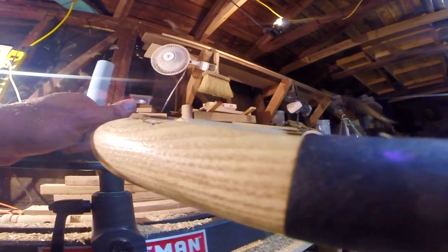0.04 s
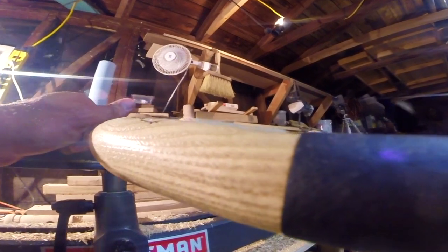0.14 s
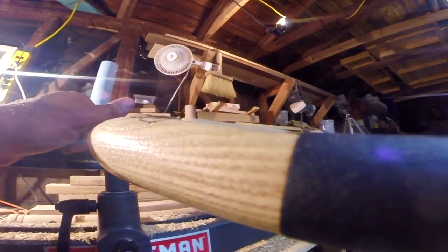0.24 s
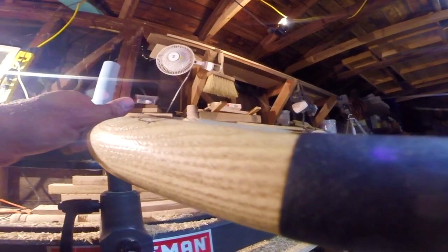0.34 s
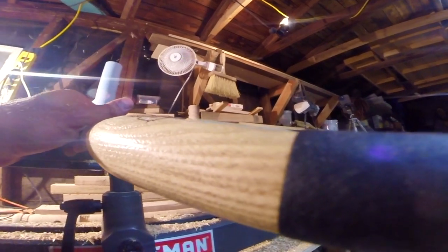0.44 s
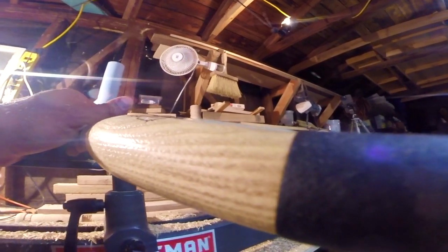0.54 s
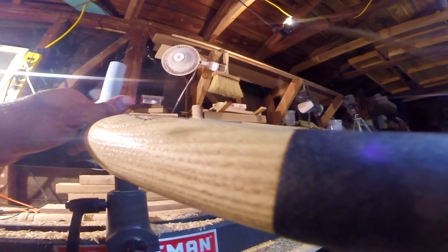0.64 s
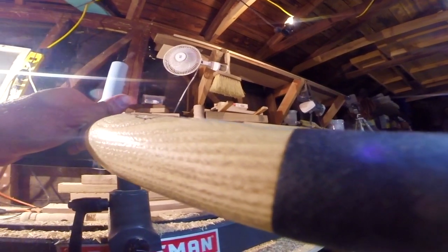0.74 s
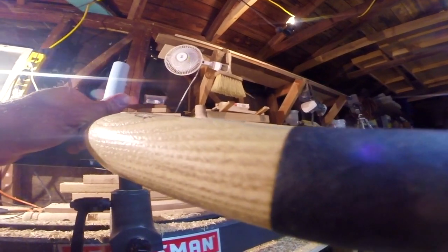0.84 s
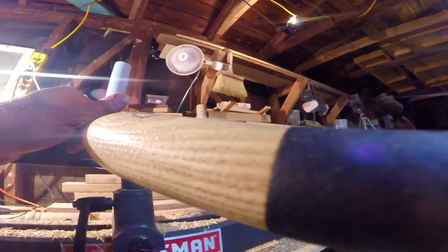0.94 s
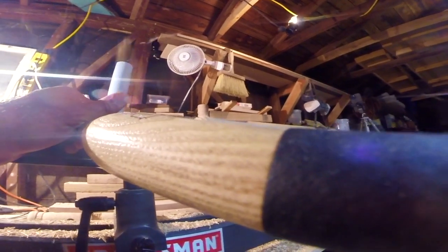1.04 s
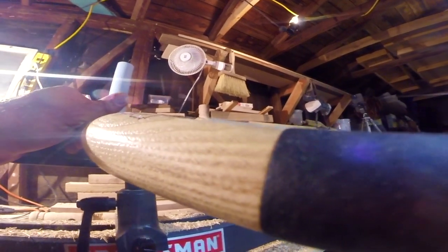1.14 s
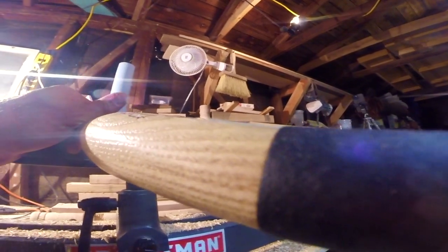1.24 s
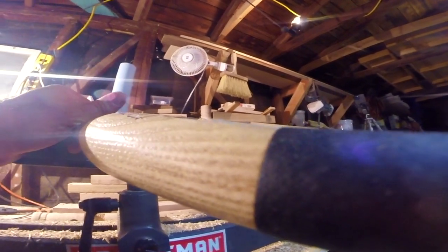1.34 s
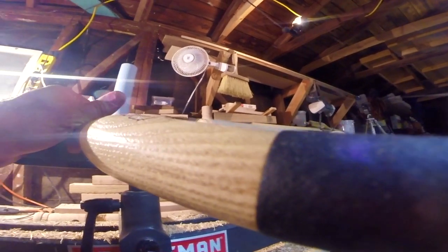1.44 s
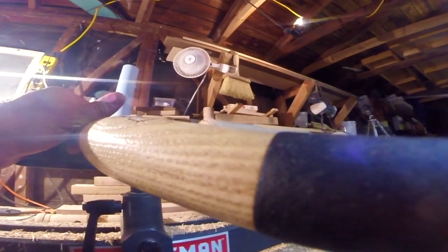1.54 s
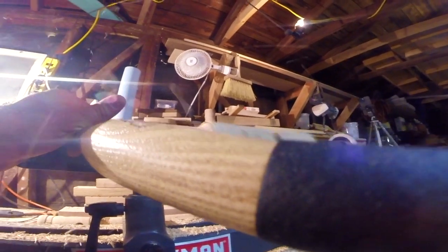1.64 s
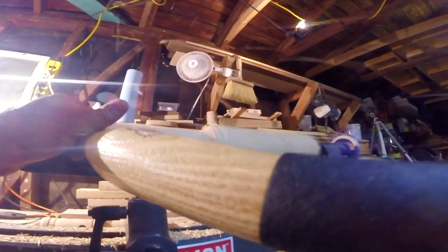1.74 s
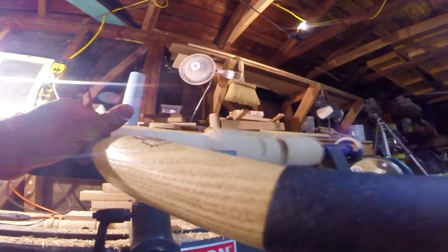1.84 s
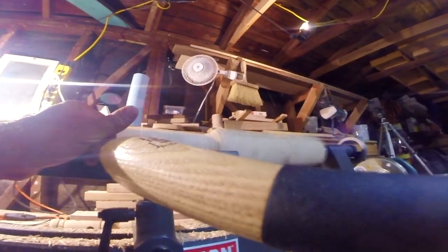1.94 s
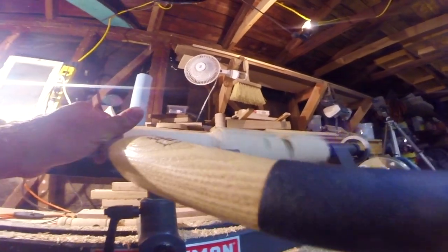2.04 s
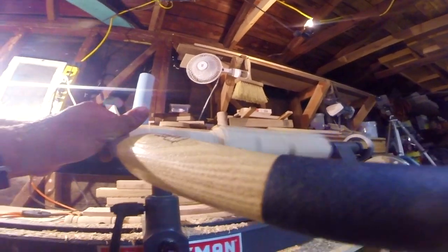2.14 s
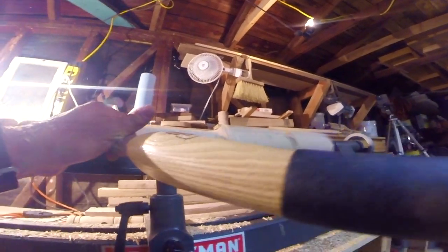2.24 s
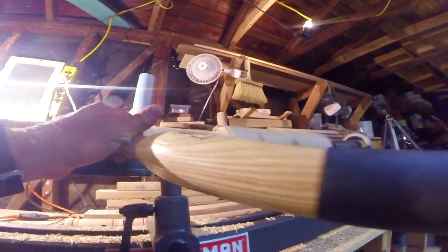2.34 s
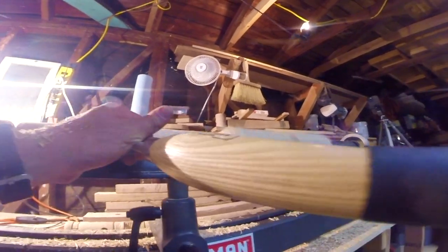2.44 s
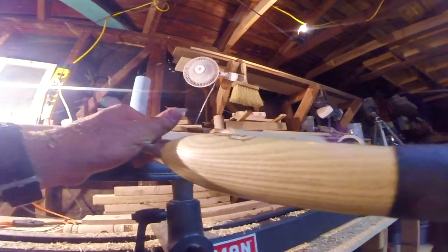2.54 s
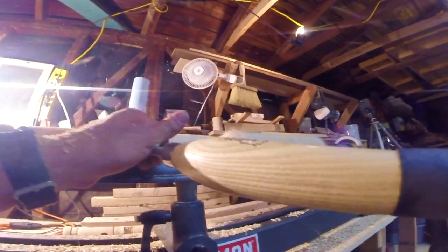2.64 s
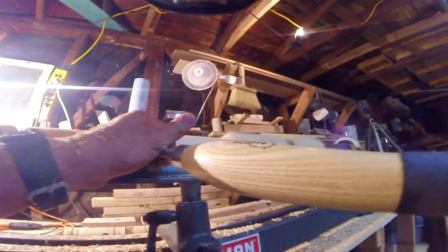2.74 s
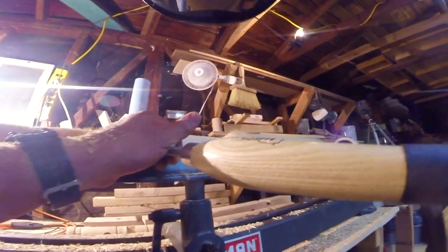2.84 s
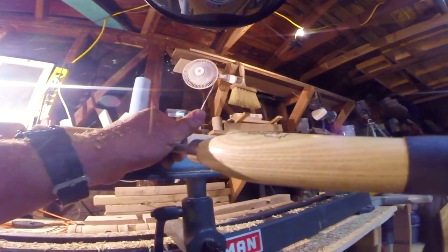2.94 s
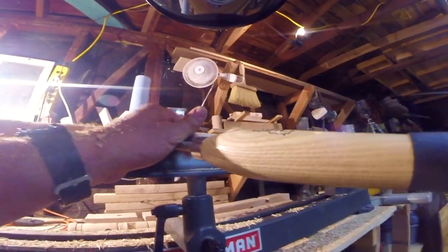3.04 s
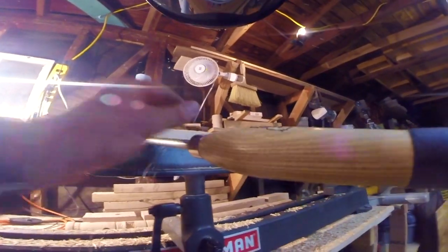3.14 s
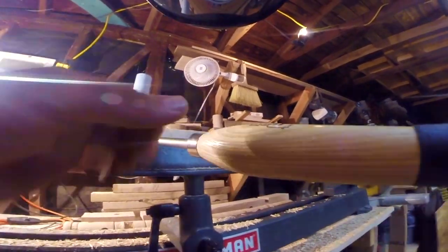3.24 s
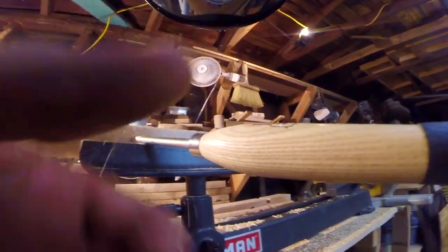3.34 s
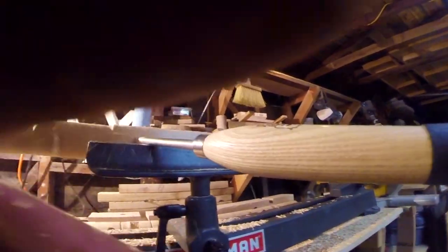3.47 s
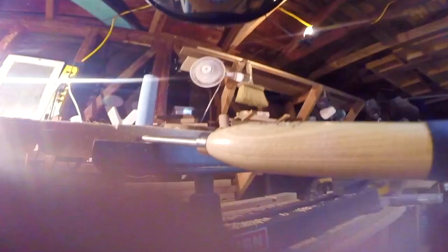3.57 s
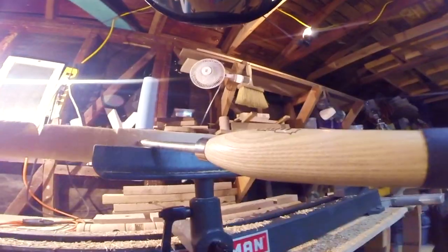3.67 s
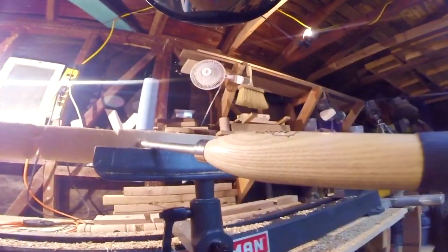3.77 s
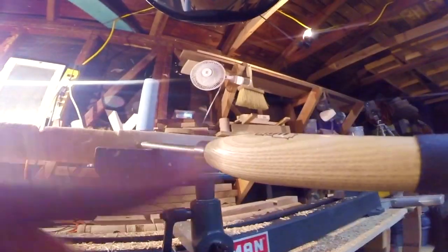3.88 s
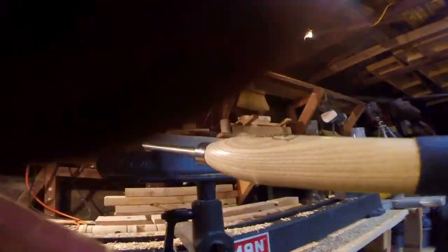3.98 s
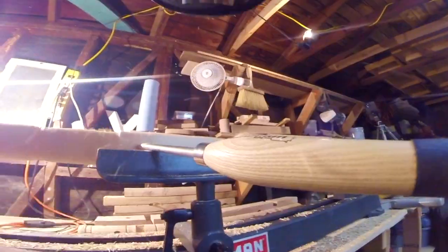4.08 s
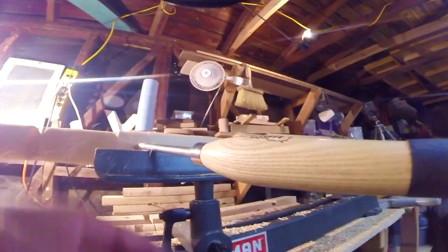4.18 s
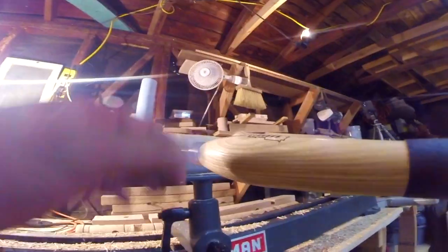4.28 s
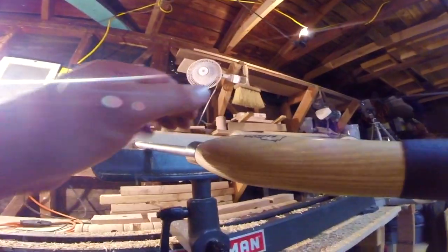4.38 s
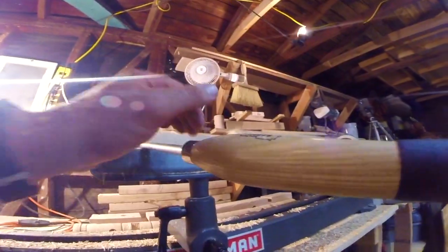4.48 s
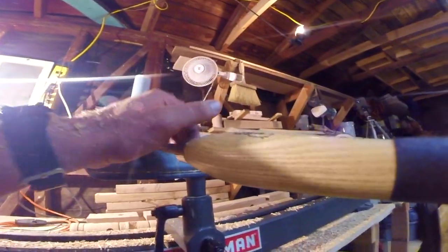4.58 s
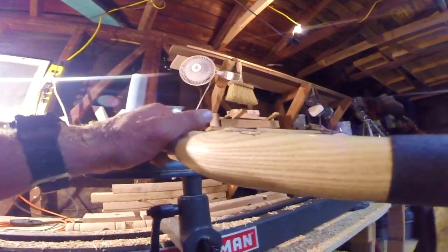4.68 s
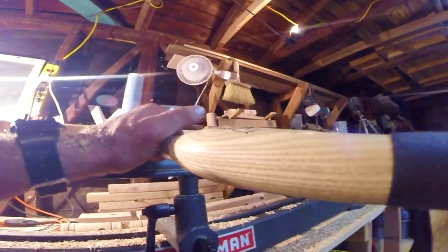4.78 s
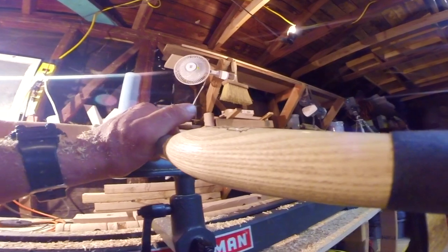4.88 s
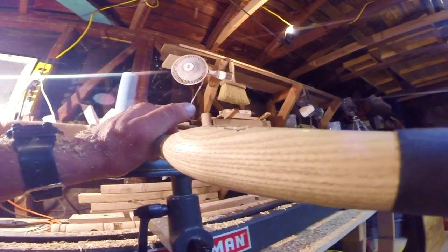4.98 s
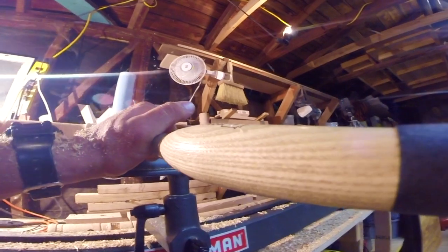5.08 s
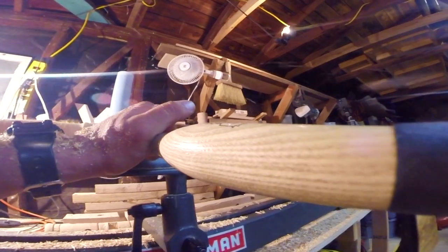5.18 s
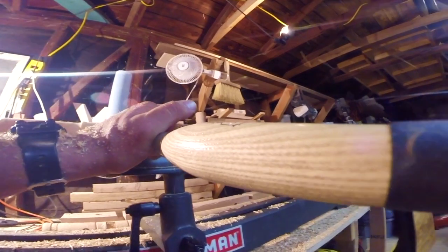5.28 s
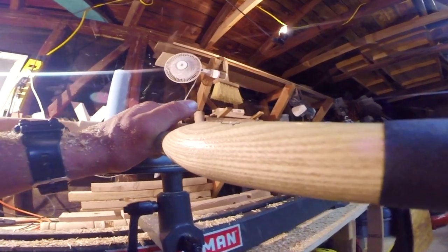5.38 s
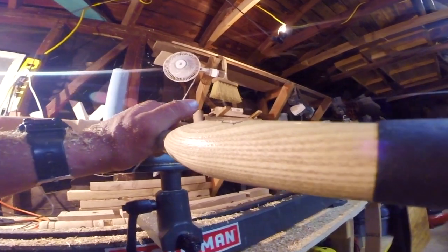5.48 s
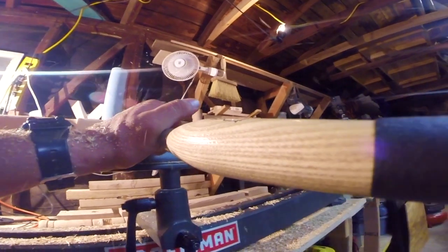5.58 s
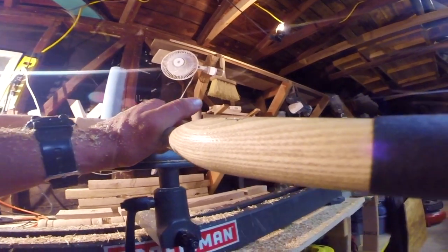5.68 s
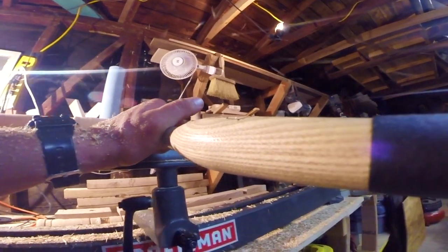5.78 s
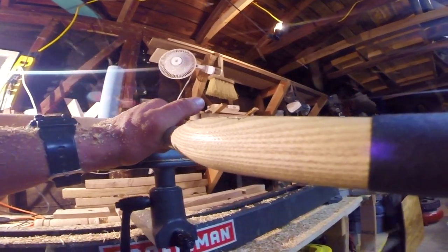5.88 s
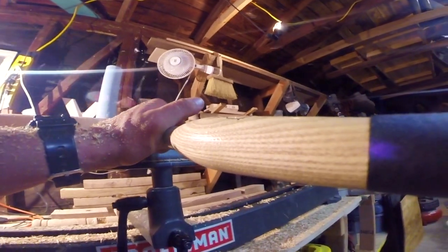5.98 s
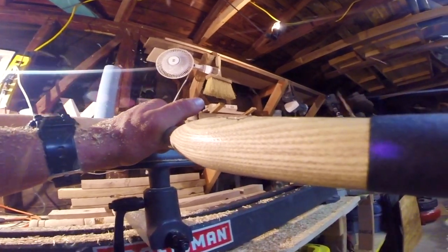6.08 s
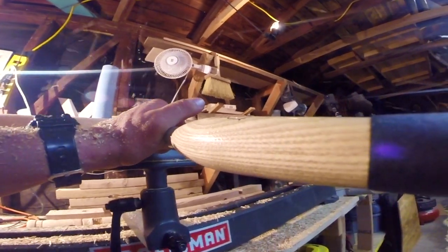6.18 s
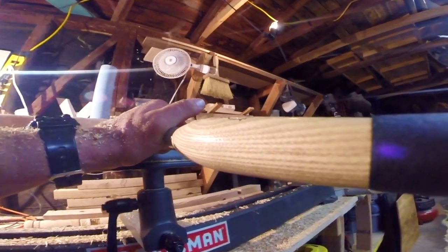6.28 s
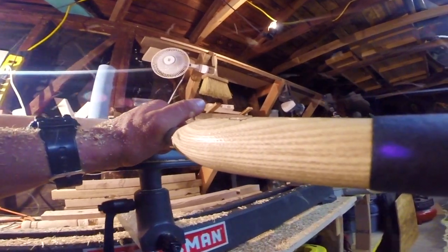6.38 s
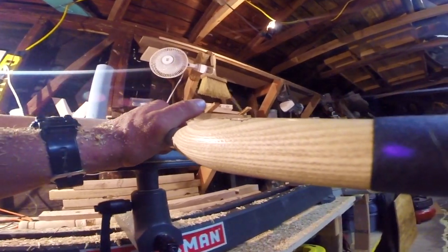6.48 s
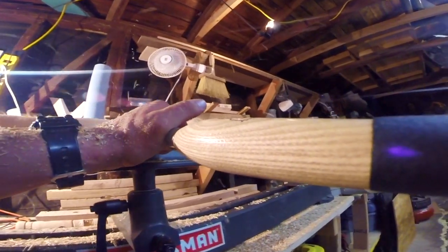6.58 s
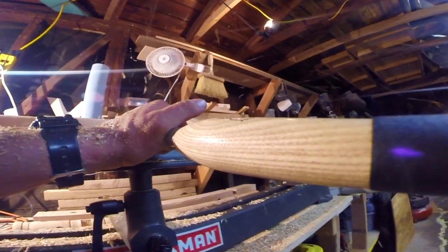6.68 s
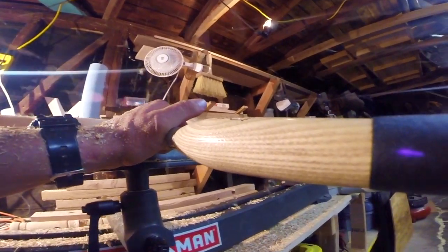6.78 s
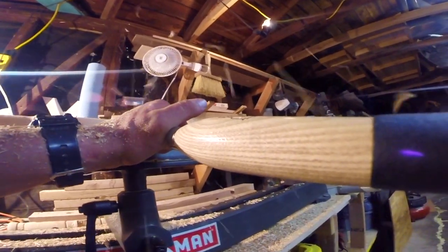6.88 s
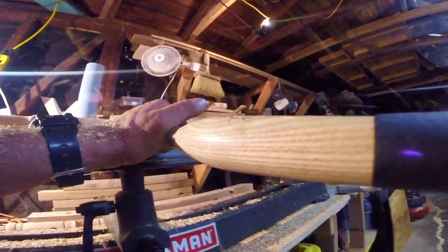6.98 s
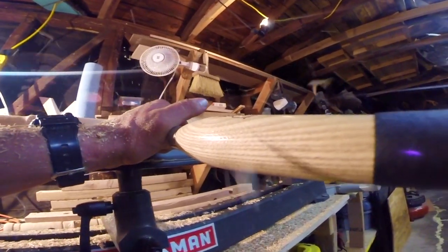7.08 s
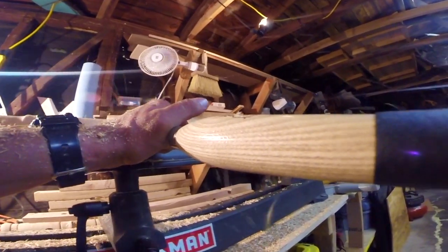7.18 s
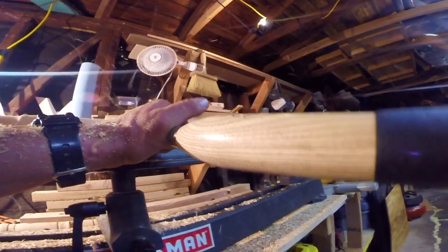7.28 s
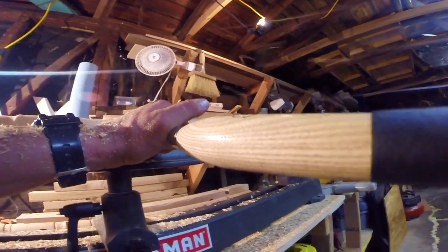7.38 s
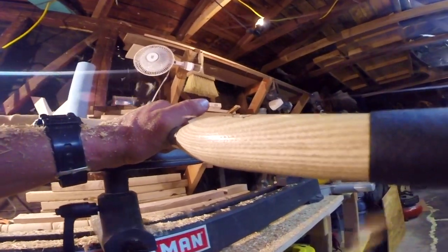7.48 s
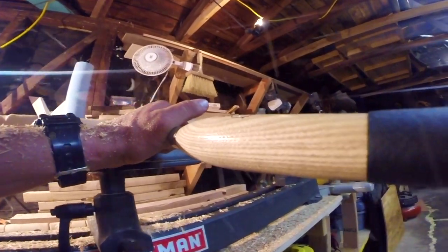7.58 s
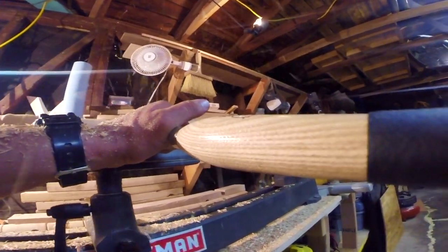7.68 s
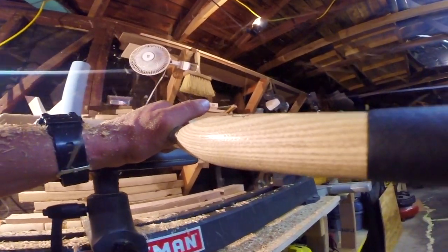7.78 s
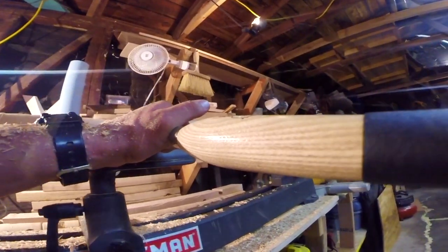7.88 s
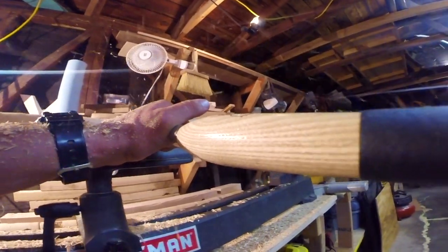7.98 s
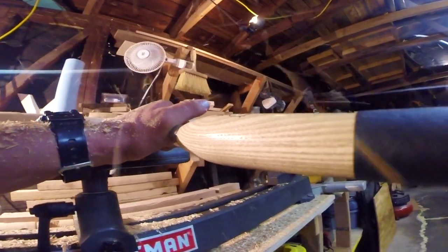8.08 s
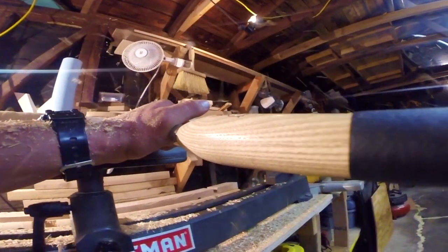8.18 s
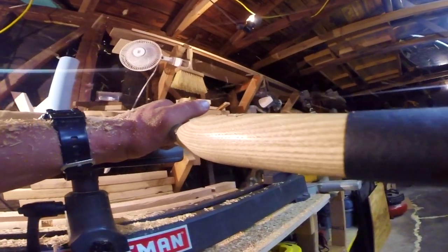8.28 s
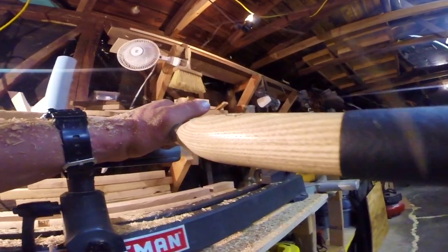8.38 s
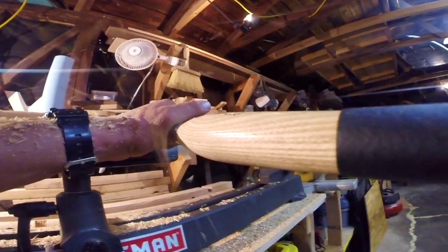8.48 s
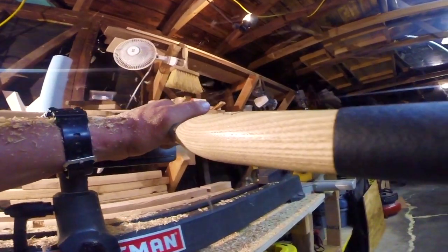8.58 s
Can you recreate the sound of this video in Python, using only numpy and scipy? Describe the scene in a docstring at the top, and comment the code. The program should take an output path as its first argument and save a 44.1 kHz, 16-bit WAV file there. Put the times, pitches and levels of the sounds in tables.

```python
"""A gouge scrapes a spindle turning on a wood lathe, heard from inside a small camera housing close by. From
the start the motor rumbles as filtered noise with faint tones, and wood fibres tear in dense clicks that swell
once and twice a turn and ring the housing and the lathe bed; the edge catches on hard spots, which ring the
housing. From 1.1 s chips tick on the housing as short noise bursts. After a faint push at 2.8 s, a finger bumps
the housing near 3.5 s and 4.0 s: pulses of squeezed air, with clacks of noise through the plastic."""
import sys
import numpy as np
from scipy import signal
from scipy.fft import rfft, irfft
from scipy.io import wavfile
from scipy.ndimage import uniform_filter1d

SR = 44100
rng = np.random.default_rng(int(sys.argv[2]) if len(sys.argv) > 2 else 0)


def pcm_store(signal):
    """Save signal as 16-bit PCM."""
    levels = np.round(np.clip(np.atleast_2d(signal), -1, 1) * 32767)
    wavfile.write(sys.argv[1], SR, levels.astype(np.int16).T)


N = 380120
T = np.arange(N) / SR  # time of every sample, s


def undb(db):
    """Turn decibels into a plain multiplier."""
    return 10 ** (np.asarray(db) / 20)


def unit(x):
    """Scale a signal to an average (RMS) strength of 1."""
    return x / np.sqrt(np.mean(x ** 2))


def curves(rows):
    """Join the rows of a table with straight lines over time, one curve per column."""
    s, *columns = np.transpose(rows)
    return [np.interp(T, s, column) for column in columns]


def causal(x, gain, size=8192):
    """Filter so each frequency is scaled by gain(Hz), with no sound before its cause (minimum phase)."""
    hz = np.fft.rfftfreq(size, 1 / SR) + 1
    cepstrum = irfft(np.log(gain(hz) + 1e-6))
    # folding the second half onto the first removes everything that would sound early
    cepstrum[1:size // 2] *= 2
    cepstrum[size // 2 + 1:] = 0
    response = irfft(np.exp(rfft(cepstrum)))[:size // 2]
    return signal.fftconvolve(x, response)[:len(x)]


def ring(x, hz, width, steep):
    """One resonance: a peak at hz whose sides fall faster when steep is larger."""
    return causal(x, lambda f: (1 + (2 * (f - hz) / width) ** 2) ** (-steep / 2), size=2048)


def walk(rate):
    """A random control of spread 1 that glides to a new value about rate times a second."""
    hold = int(SR / rate)
    steps = np.repeat(rng.standard_normal(N // hold + 1), hold)[:N]
    return unit(uniform_filter1d(steps, hold))


def bursts(rows, rise_s):
    """Envelope of bursts (t/s, level/dB, t60/s): a short rise, then a fade of 60 dB per t60."""
    out = np.zeros(N)
    for s, db, t60 in rows:
        i = int(s * SR)
        t = T[:min(SR // 16, N - i)]
        fade = undb(db - 60 * t / max(t60, .002))
        out[i:i + len(t)] += fade * (1 - np.exp(-t / rise_s)) ** 2
    return out


def crackle(rows, below, above):
    """Noise bursts (t/s, peak level/dB, t60/s, f/Hz), each in a band from f / below to f * above."""
    out = np.zeros(N)
    t = T[:SR // 20]
    for s, db, t60, hz in rows:
        noise = rng.standard_normal(len(t))
        band = signal.butter(2, [hz / below, min(hz * above, .4 * SR)], "band", fs=SR, output="sos")
        tick = signal.sosfilt(band, noise * undb(-60 * t / t60))
        i = int(s * SR)
        out[i:i + len(t)] += undb(db) * tick / np.abs(tick).max()
    return out


# motor and low band over time: (t/s, rumble level/dB, low humming band level/dB)
MOTOR_LEVELS = [(0, -53, -50.5), (1.5, -49, -45.5), (2.1, -53, -58), (2.8, -48, -53), (3.3, -51.5, -65),
                (5.9, -52, -63), (7.1, -46, -61), (7.7, -47.5, -71), (8.62, -47.5, -60)]
# colour of the rumble: (f/Hz, relative level/dB)
RUMBLE_COLOUR = [(12, -53), (20, 8.5), (60, -1), (160, -6), (242, -10), (319, -7.5), (400, -20.5),
                 (520, -32), (880, -120)]
# steady motor tones: (f/Hz, middle level/dB)
MOTOR_TONES = [(183, -58.5), (312, -65.5)]
BOOM_HZ, BOOM_WIDTH_HZ = 54, 24


def motor():
    """Coloured noise makes a wavering rumble, a narrow noise band a low hum near 54 Hz, sines the faint tones."""
    rumble_db, boom_db = curves(MOTOR_LEVELS)
    hz, db = np.transpose(RUMBLE_COLOUR)
    rumble = causal(rng.standard_normal(N), lambda f: undb(np.interp(np.log(f), np.log(hz), db)))
    rumble = unit(rumble) * undb(rumble_db + 1.0 * walk(6.5))
    boom = causal(rng.standard_normal(N), lambda f: 1 / (1 + (2 * (f - BOOM_HZ) / BOOM_WIDTH_HZ) ** 2))
    boom = unit(boom) * undb(boom_db)
    tones = sum(undb(d + 3.4 * walk(3.1)) * np.sin(2 * np.pi * f * T) for f, d in MOTOR_TONES)
    return rumble + boom + tones


# the cut over time: (t/s, drive level/dB, relative treble level of the tearing/dB)
CUT = [(0.0, -22.5, -3), (0.36, -20, -1), (0.79, -21, -7), (1.46, -20, -4.5), (1.8, -25, -2),
       (1.99, -26.5, -10), (2.42, -23, -2), (3.0, -28.5, -1.5), (3.65, -27, -1), (4.1, -32.5, -5),
       (5.3, -21, -0.5), (5.64, -23.5, 2), (7.03, -20, -0.5), (8.62, -21.5, 0.5)]


def gouge():
    """Fibres tear as the edge follows the wood, with catches on top; the tearing rings the housing and the bed,
    the catches only the housing."""
    cut_db, treble_db = curves(CUT)
    swell, grain = wood_swell()
    chatter = 1.53 * walk(45) + 1.53 * walk(110)
    dull_catches, fine_catches = catches(cut_db, grain)
    dull = undb(cut_db + 0.23 * swell + 0.54 * chatter) + dull_catches
    # small splinters break off at random
    splinter_db = 1.38 * np.clip(walk(150), 0, 2.6) ** 2 + 2.9 * walk(70)
    # fine dust hisses harder where the edge bites deeper
    dust_db = np.minimum(2.0 * swell, 7.5) + 1.07 * chatter
    fine = undb(cut_db + treble_db + dust_db + splinter_db - 3.5) + fine_catches
    return housing(dull, fine, cut_db) + bed(cut_db, swell, chatter)


# out-of-round wood over time: (t/s, lead/turns, swell once a turn, swell twice a turn);
# the swells are relative sizes, scaled to dB separately for each part of the sound
ROUNDNESS = [(0.0, -0.066, 4, 4), (1.5, -0.036, -0.5, 2), (2.4, 0.11, 3, 3), (3.3, 0.35, 1, 4.5),
             (4.2, 0.49, 4, 5), (4.85, 0.77, 2, 1.5), (5.4, 0.85, 5, 2.5), (6.4, 0.85, 2, 2.5),
             (6.85, 0.88, 0, 2), (7.15, 1.29, 4, 3), (7.56, 1.09, 7, -0.5), (7.95, 1, 2, 2),
             (8.62, 0.63, 0.5, 1)]
SPINDLE_HZ = 14.3  # turns per second before the changing lead is added
HIGH_SIDE_TURNS = 0.34  # the high side of the wood leads the end grain


def wood_swell():
    """The high side meets the edge once a turn and the end grain twice; give the swell and grain angle."""
    lead, once, twice = curves(ROUNDNESS)
    turn = 2 * np.pi * (SPINDLE_HZ * T + lead)
    grain = 2 * turn
    high_side = once * np.cos(turn + 2 * np.pi * HIGH_SIDE_TURNS)
    # end grain: a quick bite, a slower release
    end_grain = twice * (np.cos(grain) + 0.6 * np.cos(2 * grain + 0.76))
    return high_side + end_grain, grain


# the edge digs in: (t/s, drive level/dB, treble level above that/dB)
CATCHES = [(0.078, -24, 19.5), (0.104, -13, 15), (0.1446, -28, 2), (0.1685, -13, 9), (0.2114, -10, 6),
           (0.2528, -18.5, 18.5), (0.2872, -25, 2), (0.354, -15, 13), (0.389, -11.5, 5), (0.5245, -12, 0),
           (0.5871, -17, 0), (0.6644, -19, -6), (0.7034, -14, 5), (0.8061, -10, 2), (0.878, -21, 23.5),
           (0.9517, -16.5, 20), (1.0154, -15, 20.5), (1.0824, -22, 15), (1.367, -11, 16), (1.497, -7, 0),
           (1.574, -13, 10), (1.63, -15.5, 9), (2.321, -23, 18), (2.4404, -15, -4), (2.942, -17, 16),
           (3.009, -27, 12), (3.0894, -33, 10), (3.2246, -24, -12), (3.3543, -31, -9), (3.911, -22, 4),
           (4.4494, -19, 2), (4.5186, -20, -3), (4.6897, -15, -3), (5.02, -18, -1), (5.3971, -12, 2),
           (5.4575, -27, -12), (5.7793, -23, 17), (6.683, -19, 11), (6.7484, -23, 9), (7.1084, -18, 13),
           (7.2944, -9.5, 12), (7.441, -20, 20), (7.5064, -13.5, 18), (7.5772, -22, 20),
           (7.6536, -20.5, 19), (7.7154, -24, 24), (7.785, -11, 17.5), (7.8654, -26, 12),
           (7.935, -14.5, 12), (8.1065, -15, 0), (8.3045, -16, 6), (8.4316, -12.5, -1), (8.4995, -31, 4)]
CATCH_T60_S, CATCH_TREBLE_T60_S = 0.045, 0.033
SNAG_TREBLE_DB, SNAG_T60_S = 4, 0.02


def catches(cut_db, grain):
    """Hard spots and small snags jolt the edge; give the dull and treble bursts they add."""
    small = snags(cut_db, grain)
    digs = [(s, db, CATCH_T60_S) for s, db, _ in CATCHES]
    digs += [(s, db, SNAG_T60_S) for s, db in small]
    bright = [(s, db + treble, CATCH_TREBLE_T60_S) for s, db, treble in CATCHES]
    bright += [(s, db + SNAG_TREBLE_DB, CATCH_TREBLE_T60_S) for s, db in small]
    return bursts(digs, rise_s=0.0022), bursts(bright, rise_s=0.0018)


SNAG_DB, SNAG_SCATTER_DB, SNAG_JITTER_S = -10.5, 4.5, 0.007


def snags(cut_db, grain):
    """Small catches (t/s, level/dB) near end-grain passes follow the cut level, a few much stronger."""
    i = np.flatnonzero(np.diff(np.floor(grain / (2 * np.pi) + 0.15)) > 0)
    late, size = rng.random((len(i), 2)).T
    level_db = cut_db[i] + SNAG_DB - SNAG_SCATTER_DB * np.log(size + .12)
    return np.c_[T[i] + SNAG_JITTER_S * late, level_db][:-1]


def tearing(scatter_db):
    """Sizes of dense clicks, unequal, none above the size of a whole fibre."""
    return unit(undb(scatter_db * np.minimum(rng.exponential(size=N), 5)))


# resonances of the housing: (f/Hz, width/Hz, relative level/dB)
HOUSING = [(1096, 125, -13), (1474.3, 90.6, 3), (1597, 213, -2.5), (2001, 217, -6), (2207, 205, -5.5),
           (2785, 490, -11.5), (3252, 285, -14.5), (4110, 375, -16), (4963, 494, -20.5), (6000, 1030, -30),
           (7015, 390, -28.5), (7640, 2360, -35), (10600, 1700, -49), (12900, 1800, -48)]
# a light cut hardly rings the steel: near STEEL_HZ each dB below the full cut costs up to STEEL_SLOPE dB more
STEEL_HZ, STEEL_WIDTH_HZ, STEEL_SLOPE, FULL_CUT_DB = 2250, 140, 0.44, -22.5


def housing(dull, fine, cut_db):
    """Tearing clicks ring each resonance; the fine part counts mainly above 3500 Hz."""
    clicks = tearing(2.57)
    out = 0
    for hz, width, db in HOUSING:
        # every click lands elsewhere, so each resonance gets its own share and now and then pings alone
        ping_db = 0.92 * np.clip(walk(70), 0, 2.5) ** 2
        nearness = np.exp(-((hz - STEEL_HZ) / STEEL_WIDTH_HZ) ** 2)
        steel_db = STEEL_SLOPE * (cut_db - FULL_CUT_DB) * nearness
        share = undb(db + 16.5 + steel_db + 1.27 * walk(40) + ping_db) * rng.standard_normal(N)
        drive = np.hypot(dull, fine / np.hypot(1, (3500 / hz) ** 2))
        out = out + ring(clicks * share * drive, hz, width, steep=1.487)
    return out


# resonances of the lathe bed: (f/Hz, width/Hz, relative level/dB)
BED = [(312.4, 53, -9), (469, 23, -8.5), (513.6, 28, -4), (664, 32, 0), (712, 166, -5), (825.5, 49, -1.5)]
BED_SLOPE = 0.77  # dB per dB of cut: the bed keeps shaking when the cut eases


def bed(cut_db, swell, chatter):
    """The cut shakes the heavy bed, whose resonances shape random noise into a low ringing."""
    out = 0
    for hz, width, db in BED:
        shake_db = db + 0.5 + BED_SLOPE * cut_db + 0.15 * swell + 0.51 * chatter + 1.64 * walk(20)
        out = out + ring(undb(shake_db) * rng.standard_normal(N), hz, width, steep=1.2)
    return out


# chips tick on the housing: (t/s, peak level/dB, centre f/Hz)
CHIPS = [(1.149, -10, 8050), (3.039, -13, 4300), (3.046, -37, 6900), (3.183, -30, 11000),
         (4.347, -13, 2930), (4.3512, -14, 6900), (5.78, -9, 5000), (6.334, -9.5, 4500), (7.2514, -7, 5970),
         (7.2557, -1.5, 2980), (7.366, -4.5, 3760), (7.47, -21, 9000), (7.547, -7, 4340),
         (7.674, -20, 8000), (7.69, -24, 8000), (7.912, -24, 10000), (8.152, -10.5, 5800),
         (8.289, -22, 8000), (8.362, -16, 6850)]


def chips():
    """Each chip striking the housing is a few milliseconds of crackling noise around its own pitch."""
    return crackle([(s, db, .007, hz) for s, db, hz in CHIPS], below=1.8, above=1.7)


# finger pushes: (t/s, push level/dB, direction +1 or -1, rise/ms, release/ms, rebound share, settling/ms)
BUMPS = [(2.80, -29, 1, 6, 4, .8, 8), (3.478, -14, -1, 4, 3, .9, 9), (3.502, -16, 1, 2, 1.5, .3, 6),
         (3.549, -9, -1, 1.2, 4, .2, 8), (3.611, -14, 1, 9, 2, 0, 1), (3.6152, -5, 1, 1.6, 1.2, 1.4, 4.2),
         (3.637, -20, 1, 4, 2, .2, 5), (3.9537, 0, 1, .4, .9, 0, 1), (3.9562, -2, -1, 3.2, 1.9, .9, 2.3),
         (3.9785, -13, -1, .5, 3.5, .1, 6), (3.997, -21, -1, 3, 2, .2, 5), (4.027, -26, 1, 4, 2, 2, 3.5)]
# the plastic clacks under the finger: (t/s, peak level/dB, t60/s, centre f/Hz)
CLACKS = [(3.526, -17, 0.018, 1800), (3.545, -9.5, 0.03, 2020), (3.609, -11.5, 0.062, 520),
          (3.614, -11.5, 0.02, 2770), (3.9525, 0.5, 0.017, 1520), (3.9775, -23, 0.017, 600),
          (4.022, -21, .05, 2200)]


def bumps():
    """The housing wall squeezes the air inside and springs back; dull clacks run through the plastic."""
    out = np.zeros(N)
    ms = (np.arange(SR // 10) / SR - .04) * 1000  # time around the push, from 40 ms before it
    for s, db, way, rise, release, rebound, settle in BUMPS:
        push = np.exp(-.5 * (ms / np.where(ms < 0, rise, release)) ** 2)
        late = ms - 2.6 * release  # the rebound peaks after the push
        back = np.exp(-.5 * (late / np.where(late < 0, release, settle)) ** 2)
        i = int((s - .04) * SR)
        out[i:i + len(ms)] += way * undb(db) * (push - rebound * back)
    return out + crackle(CLACKS, below=3.1, above=1.53)


def scene():
    """Add all the sources into one channel."""
    return (motor() + gouge() + chips() + bumps())[None]


TOP_HZ = 15100


def record(dry):
    """The recorder rounds the loudest peaks and cuts the top."""
    soft = 1.5 * np.tanh(dry / 1.5)
    return signal.sosfilt(signal.ellip(8, .2, 70, TOP_HZ, fs=SR, output="sos"), soft)


dry = scene()
out = record(dry)
pcm_store(out)
```